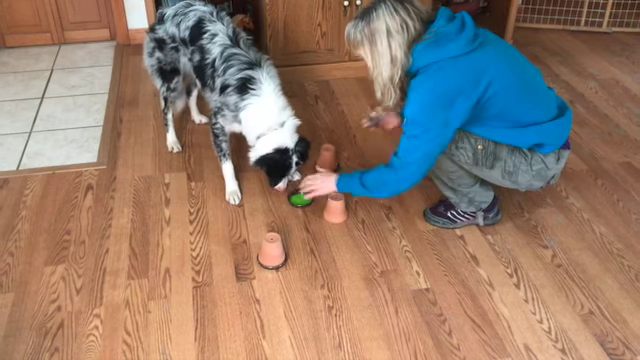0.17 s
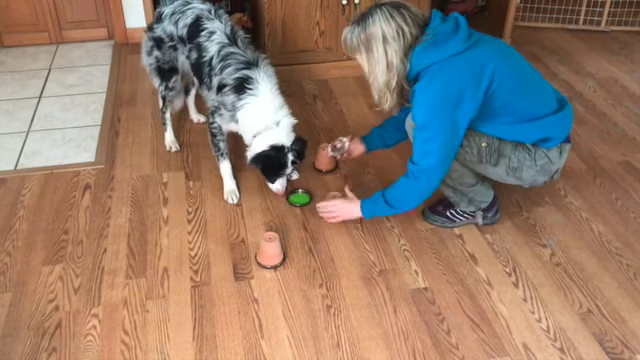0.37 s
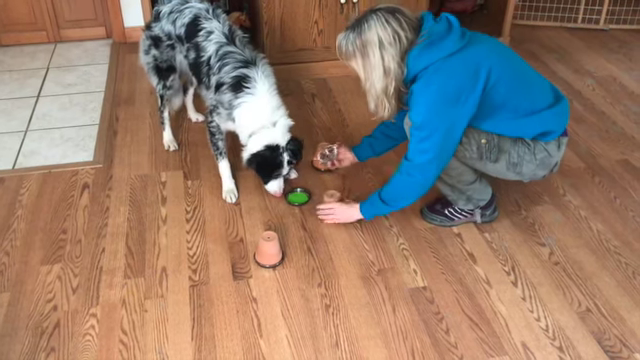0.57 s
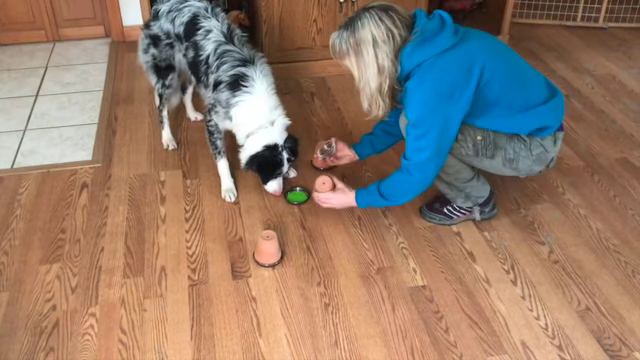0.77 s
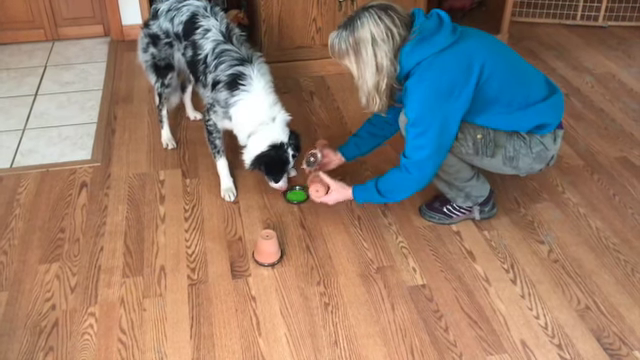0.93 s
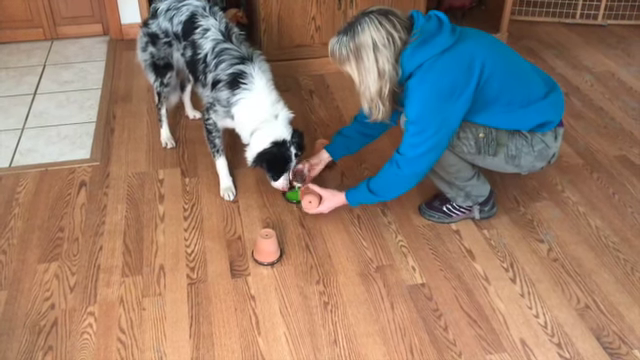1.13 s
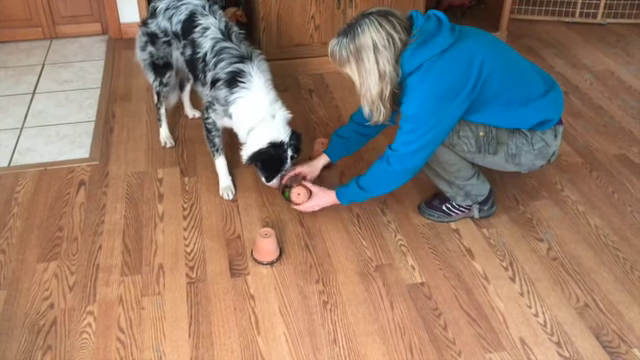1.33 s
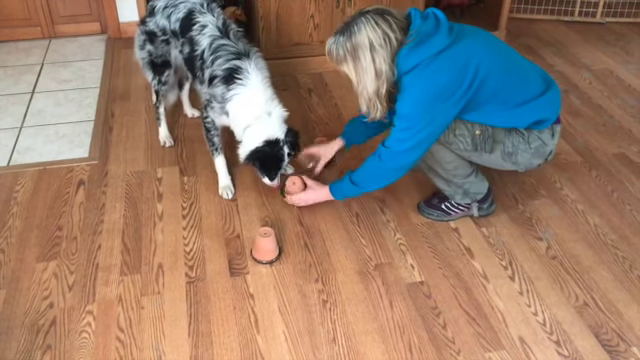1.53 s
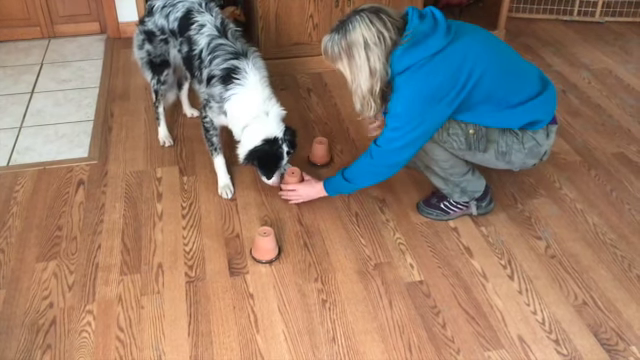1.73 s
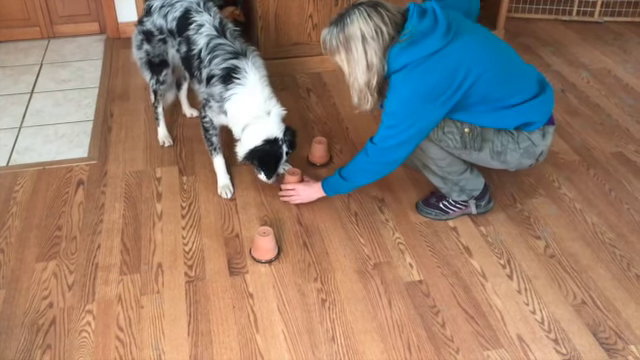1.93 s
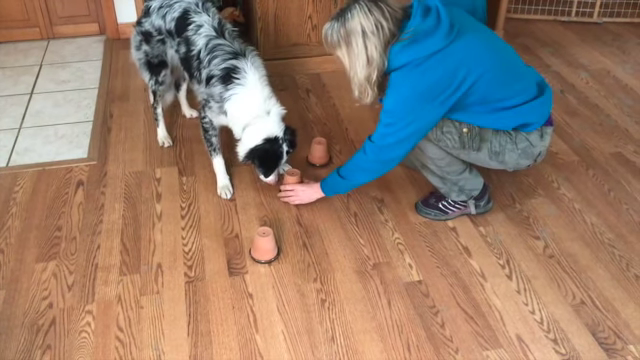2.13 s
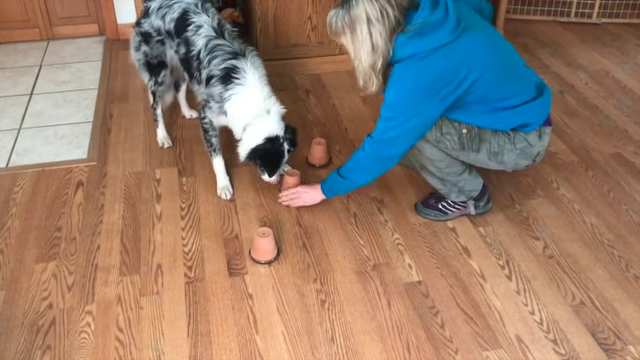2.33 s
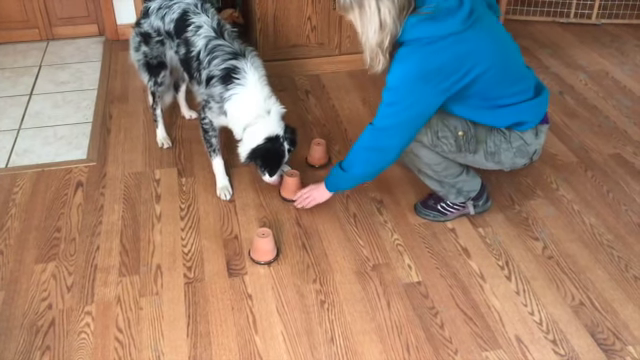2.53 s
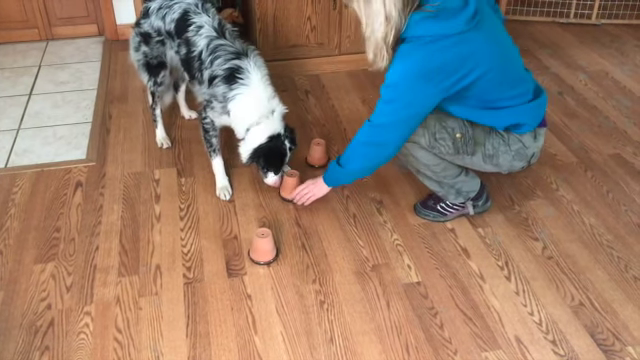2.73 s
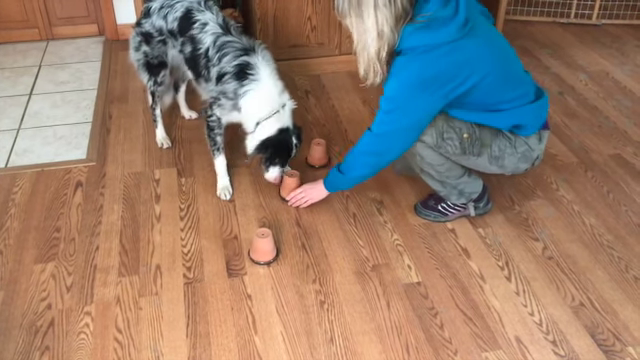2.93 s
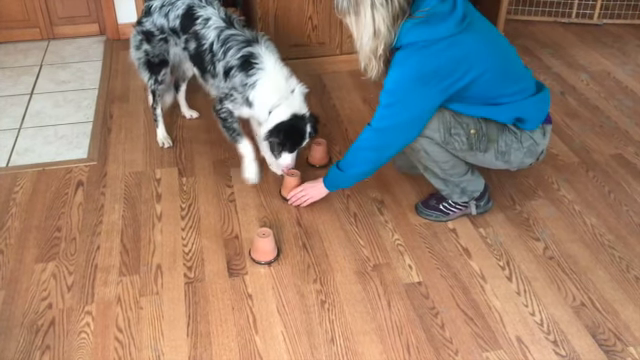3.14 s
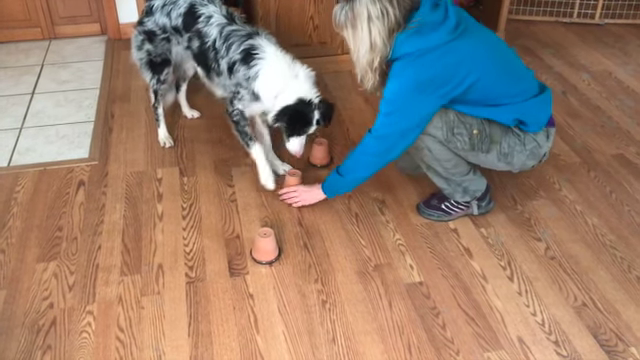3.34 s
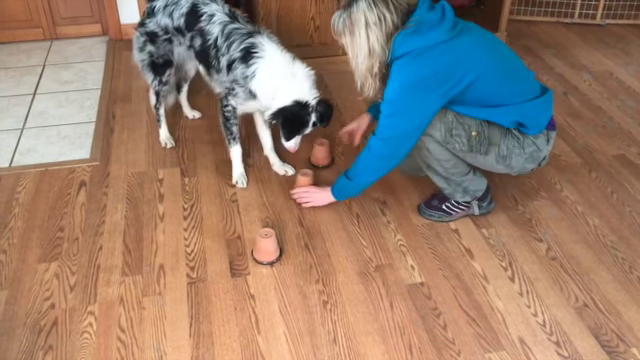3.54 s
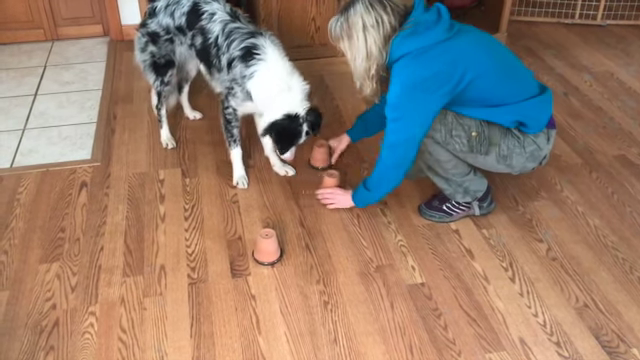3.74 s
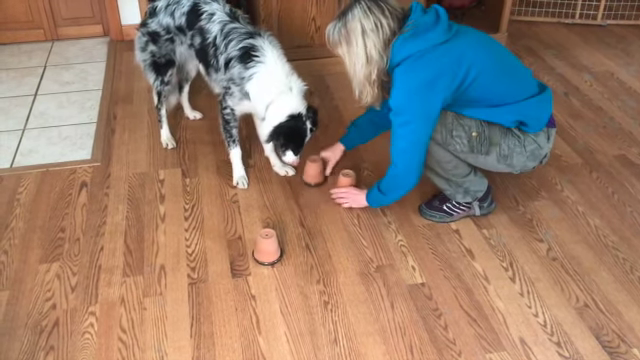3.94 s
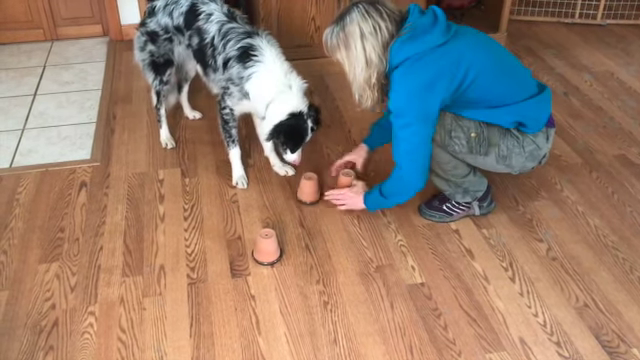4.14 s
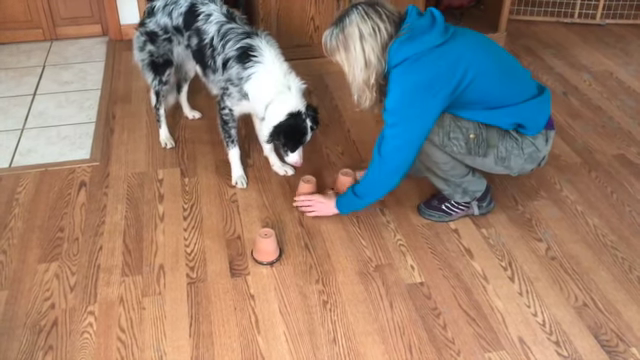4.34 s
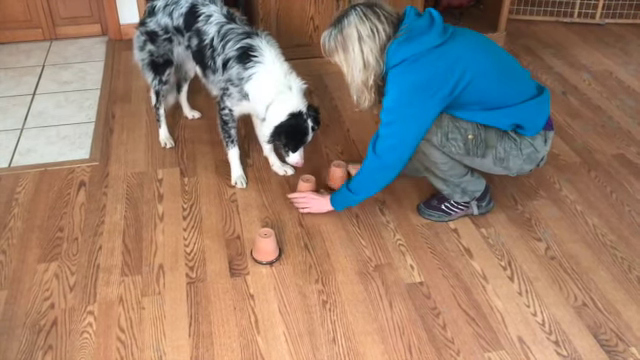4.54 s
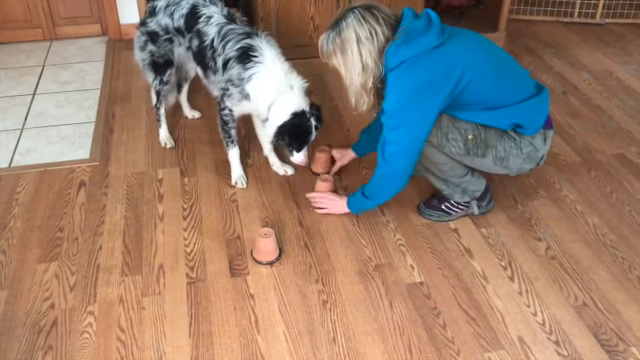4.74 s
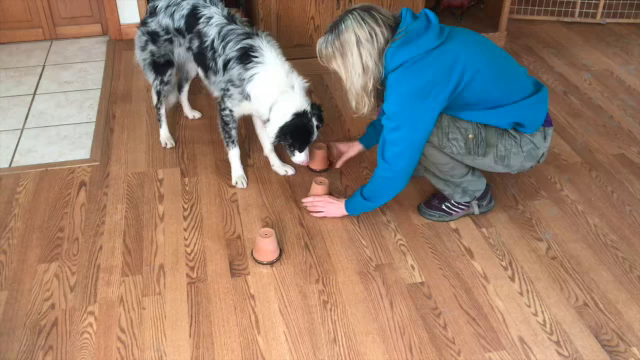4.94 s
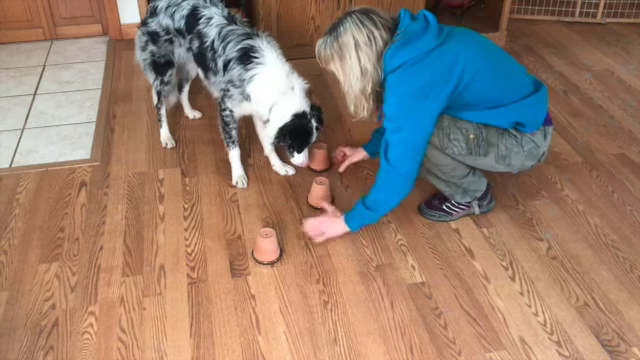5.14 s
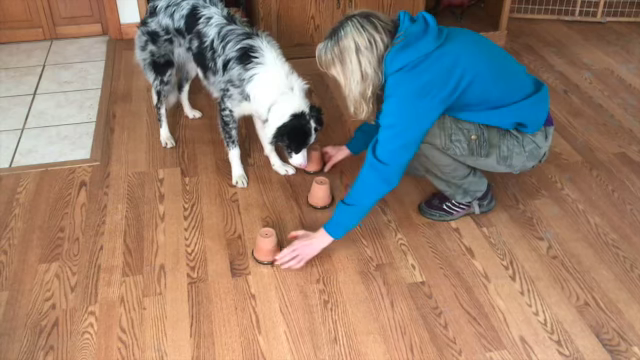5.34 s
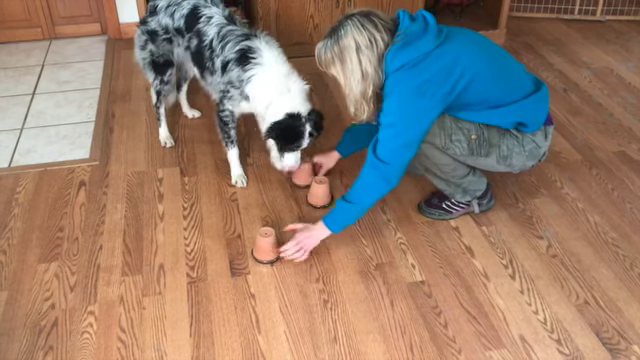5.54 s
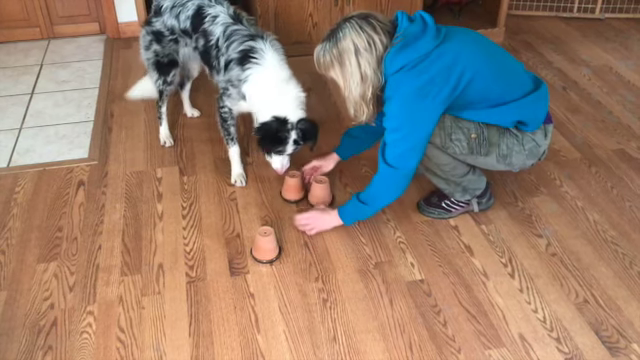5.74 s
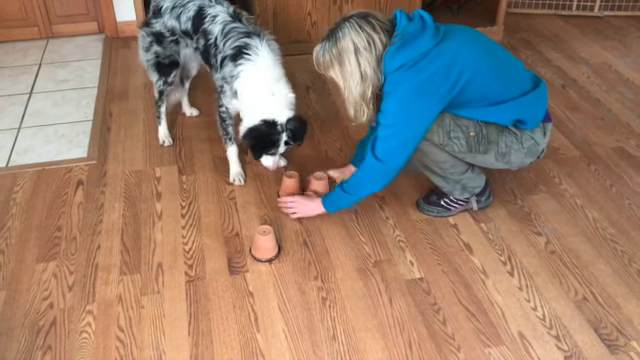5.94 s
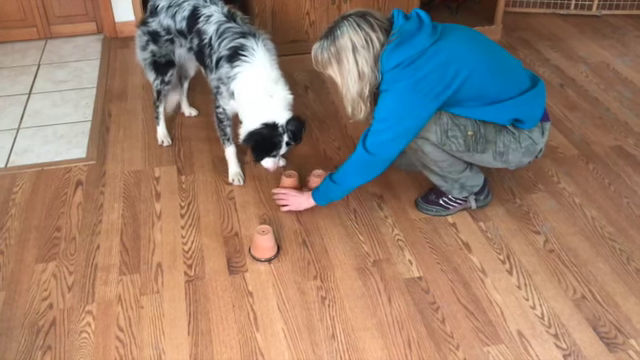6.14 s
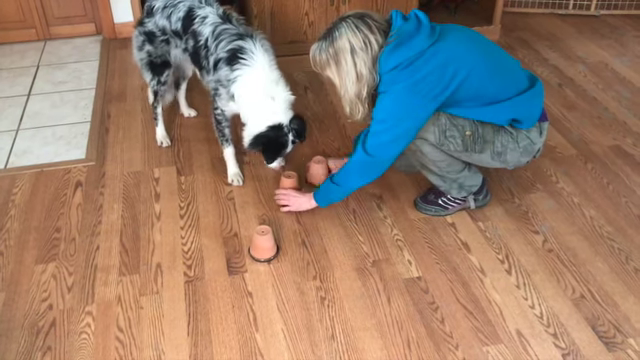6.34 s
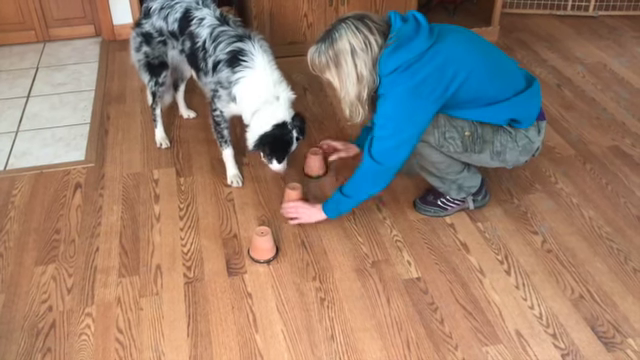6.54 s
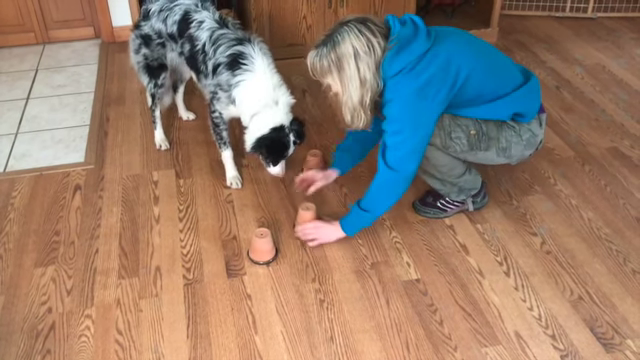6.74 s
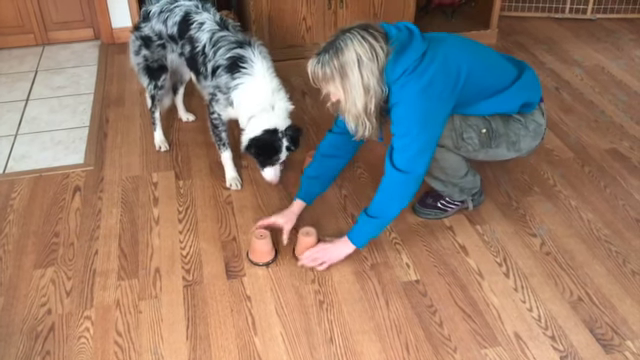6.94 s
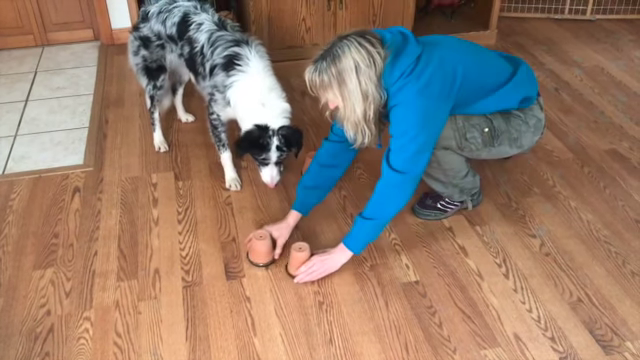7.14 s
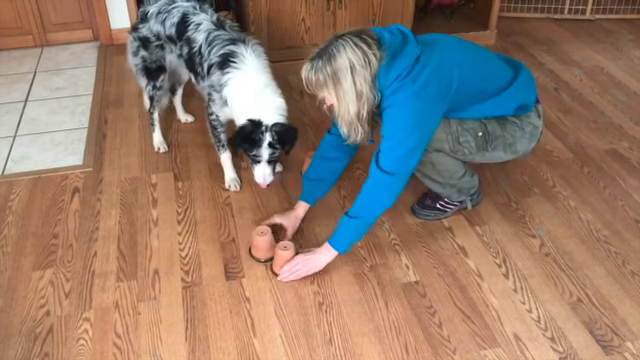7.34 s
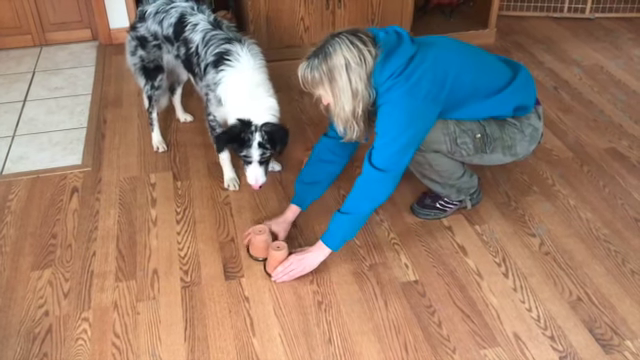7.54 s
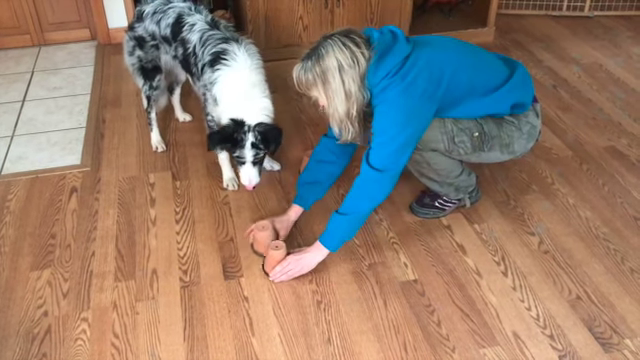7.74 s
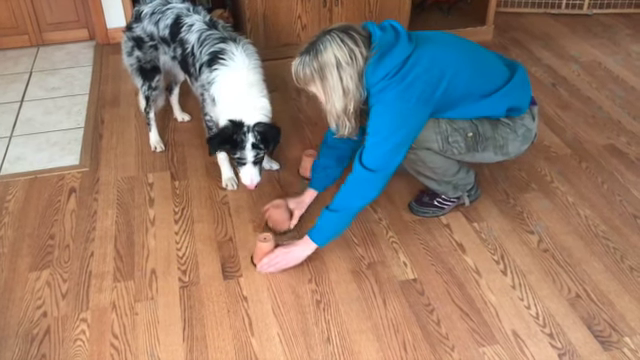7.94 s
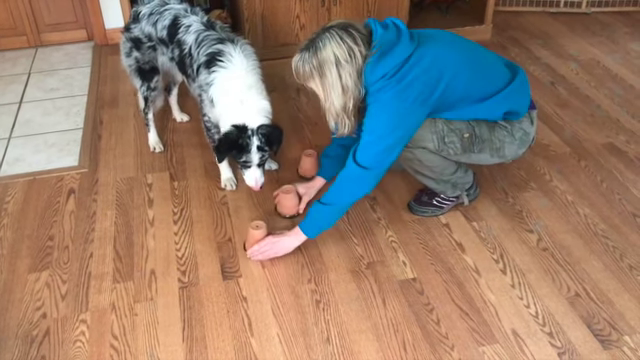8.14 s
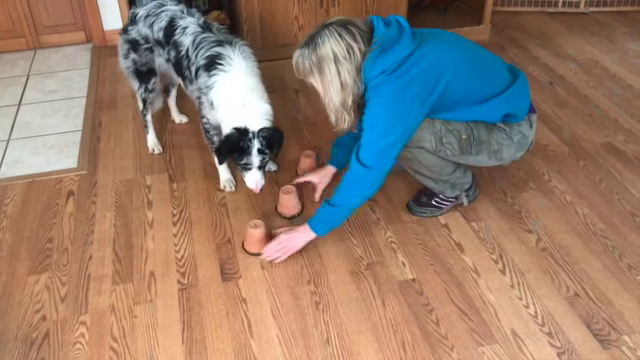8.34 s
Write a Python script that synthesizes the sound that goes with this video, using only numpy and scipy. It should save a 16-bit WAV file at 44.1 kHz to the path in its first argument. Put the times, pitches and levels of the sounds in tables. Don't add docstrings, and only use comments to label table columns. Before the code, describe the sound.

A distant small camera microphone with soft hiss, a thin whine and regular faint ticks picks up terracotta pots on floorboards. A pot is set down with a woody knock and rocks back, then after a pause pots are pushed in rough, juddering strokes. Short ceramic clacks and light touches punctuate the slides, which come faster and closer together as the room answers with a short reverberation.

```python
import sys
import numpy as np
from scipy import signal
from scipy.fft import rfft, irfft
from scipy.io import wavfile
from scipy.ndimage import uniform_filter1d

SR = 44100
rng = np.random.default_rng(int(sys.argv[2]) if len(sys.argv) > 2 else 0)


def inscribe(sig):
    pcm = np.round(np.clip(np.atleast_2d(sig).T, -1, 1) * 32767)
    wavfile.write(sys.argv[1], SR, pcm.astype(np.int16))


def linear_from_db(decibels):
    return 10 ** (np.asarray(decibels, float) / 20)


N = 369999


def unit(x):
    return x / np.sqrt(np.mean(x ** 2) + 1e-30)


def response(points, size=2048):
    hz, db = np.transpose(points)
    log_hz = np.log(np.fft.rfftfreq(size, 1 / SR) + 1)
    cepstrum = irfft(np.interp(log_hz, np.log(hz), db) * np.log(10) / 20)
    cepstrum[1:size // 2] *= 2
    cepstrum[size // 2 + 1:] = 0
    h = irfft(np.exp(rfft(cepstrum)))
    return h / np.sqrt(np.sum(h ** 2))


def ring(x, hz, width_hz):
    r = np.exp(-np.pi * width_hz / SR)
    turn = 2 * np.pi * hz / SR
    gain = np.sin(turn) * np.sqrt(2 * (1 - r * r))
    return signal.lfilter([gain], [1, -2 * r * np.cos(turn), r * r], x)


def walk(rate, size, step=1):
    k = int(SR / rate / step)
    held = np.repeat(rng.standard_normal(size // k + 1), k)
    return 1.5 * uniform_filter1d(uniform_filter1d(held, k), k)[:size]


def band(x, lo_hz, hi_hz, order=2):
    return signal.sosfilt(signal.butter(order, [lo_hz, hi_hz], "band", fs=SR, output="sos"), x)


def below(x, hz):
    return signal.sosfiltfilt(signal.butter(2, hz, fs=SR, output="sos"), x)


# f/Hz, density/dB
HISS_COLOUR = [(24, -29), (40, -4.5), (80, -6.5), (148, -3.5), (204, -3), (448, -15), (1330, -16),
               (2710, -28), (3560, -25.5), (5820, -28), (6270, -25), (6750, -29), (10500, -37),
               (14500, -31)]
# f/Hz, width/Hz, level/dB
HUMS = [(59.1, 3, -71), (100, 6.4, -71.5), (203.7, 2.4, -80), (255, 3.1, -79.5), (296.2, 4.8, -78.5),
        (3640, 4.5, -92)]


def house():
    hiss = signal.fftconvolve(rng.standard_normal(N), response(HISS_COLOUR))[:N]
    hums = sum(linear_from_db(db) * unit(ring(rng.standard_normal(N), hz, width)) for hz, width, db in HUMS)
    return unit(hiss) * linear_from_db(-67) + hums


# f/Hz, tremble/Hz, level/dB
WHINE_TONES = [(6120, 4, -97), (6240, 28, -84), (6460, 7, -91), (12904, 20, -99)]
# stop t/s, start t/s (no pause if the start comes first)
PAUSES = [
    (1.113, 0.99),
    (2.395, 2.428),
]
# first t/s, period/s, last t/s, level/dB
TICK_SERIES = [
    (.0145, .30763, 8.39, -50),
    (.118, .30763, 1.1, -52),
    (.2205, .30763, 1.2, -53),
    (.002, .05008, 8.39, -62),
]
TICK_TRIM = [0.3, 0.3, 0.3, 0.3]
# f/Hz, width/Hz, level/dB
TICK_MODES = [(3500, 1600, 3.5), (4330, 1000, -6), (8400, 510, -7), (14000, 2500, -15)]
# f/Hz, width/Hz, level/dB
LATCH_MODES = [(2470, 700, 1), (3580, 640, 4), (6750, 1400, -5)]


def camera():
    t = np.arange(N) / SR
    running, ticks, latches = np.ones(N), np.zeros(N), np.zeros(N)
    for stop, start in PAUSES:
        running[int(stop * SR):int(start * SR)] = .1
        latches[int(stop * SR)] = linear_from_db(-48)
    for (first, period, last, db), trim_db in zip(TICK_SERIES, TICK_TRIM):
        i = (np.arange(first, last, period) * SR).astype(int)
        ticks[i] += linear_from_db(db + trim_db + .8 * rng.standard_normal(len(i)))
    whine = np.zeros(N)
    for hz, tremble_hz, db in WHINE_TONES:
        phase = 2 * np.pi * np.cumsum(hz + tremble_hz * walk(150, N)) / SR
        whine += linear_from_db(db + 3.5) * np.sin(phase)
    clicks = sum(linear_from_db(db) * ring(ticks, hz, width) for hz, width, db in TICK_MODES)
    clicks += sum(linear_from_db(db) * ring(latches, hz, width) for hz, width, db in LATCH_MODES)
    clicks = signal.sosfilt(signal.butter(2, 2000, "high", fs=SR, output="sos"), clicks)
    beat = np.cos(2 * np.pi * 29.97 * t + 1.1)
    chirp = unit(ring(ring(rng.standard_normal(N), 15500, 1600), 15500, 1600))
    flicker_db = 4 * beat + 5 * walk(120, N)
    return whine * uniform_filter1d(running, 200) + clicks + chirp * linear_from_db(-88 + flicker_db)


# f/Hz, density/dB
GRIT_COLOUR = [(1470, -29.5), (2500, -5), (3010, -3.5), (3260, -1.5), (3820, -1.5), (4190, 2), (5010, -8.5),
               (6000, -9), (7270, -19.5), (7790, -19.5), (8310, -26.5), (10000, -31.5), (13000, -55),
               (22000, -120)]
# f/Hz, level/dB, t60/s
HELD_MODES = [(588, -6, 0.065), (1012, -12, 0.065), (1278, -3, 0.041), (3395, -13.5, 0.05),
              (4050, -19.5, .06), (4600, -24.5, 0.033), (5870, -18.5, 0.042), (6800, -39, 0.043),
              (7460, -40, .03)]
# f/Hz, level/dB, t60/s
FREE_MODES = [(1170, -15, 0.072), (1526.7, -8.5, 0.075), (3300, -18.5, 0.066), (3660, -16, 0.027),
              (1485, -8, 0.15), (4086, -10, 0.037), (4280, -22.5, 0.057), (5930, -27, 0.05),
              (6760, -25, 0.057), (7600, -32, .04), (9400, -37.5, 0.05), (10000, -46.5, 0.045),
              (12050, -43.5, .02), (12800, -44, .025)]
SET_DOWN_S = 3.0
CONTACT_HZ = 300


def pot(crack, wall, patchy_db, damping, edge_db):
    out = signal.fftconvolve(crack, response(GRIT_COLOUR))[:N]
    held = np.arange(N) < SET_DOWN_S * SR
    for modes, share in ((HELD_MODES, held), (FREE_MODES, ~held)):
        for hz, db, t60 in modes:
            stilled_db = edge_db * (hz < 2000 or hz > 7000)
            gain = linear_from_db(db + stilled_db + patchy_db * walk(7, N // 50 + 1, step=50))
            push = wall * share * np.repeat(gain, 50)[:N]
            push = band(push, hz - CONTACT_HZ, hz + CONTACT_HZ, order=1)
            out = out + ring(push, hz, damping * np.log(1000) / np.pi / t60)
    return out


BREAKAWAY = 0.24


def speed(t, start, full, slows, stop):
    rise = np.sin(np.pi / 2 * np.clip((t - start) / max(full - start, .003), 0, 1))
    fall = np.sin(np.pi / 2 * np.clip((stop - t) / max(stop - slows, .003), 0, 1))
    return np.maximum((BREAKAWAY + (1 - BREAKAWAY) * rise) * fall, .01)


# f/Hz, density/dB
BOARD_COLOUR = [(59, -49.5), (100, -25.5), (124, -28), (207, -10), (324, -13.5), (475, -6), (528, -8.5),
                (579, -3), (796, -1.5), (1520, 1), (2350, -17), (3060, -62.5), (5170, -120)]
# start t/s, full speed t/s, slowing t/s, stop t/s, drag level/dB at full speed
HAND_PUSHES = [(0.001, 0.002, 0.01, .05, -64.5), (.566, 0.602, 0.61, 0.67, -61.5),
               (1.228, 1.26, 1.28, 1.37, -56.5), (1.825, 1.853, 1.84, 1.935, -62),
               (2.165, 2.215, 2.22, 2.32, -57.5), (3.396, 3.558, 3.91, 3.94, -40.5),
               (3.805, 3.878, 4.17, 4.355, -40), (4.412, 4.67, 4.74, 5.074, -37.5),
               (5.292, 5.324, 5.48, 5.6, -45.5), (5.41, 5.56, 5.71, 5.73, -39),
               (5.706, 5.722, 5.7, 5.84, -34), (5.805, 5.874, 5.992, 6.082, -48),
               (6.122, 6.325, 6.61, 6.64, -39.5), (6.505, 6.567, 6.62, 6.7, -37.5),
               (6.612, 6.692, 7, 7.06, -36.5), (6.915, 6.982, 7.065, 7.22, -37),
               (7.218, 7.263, 7.43, 7.47, -38.5), (7.442, 7.45, 7.37, 7.49, -34.5),
               (7.542, 7.602, 7.9, 8, -52), (7.646, 7.657, 7.55, 7.752, -39),
               (7.715, 7.775, 7.955, 8.005, -37), (7.965, 7.99, 8.04, 8.105, -36.5),
               (8.035, 8.085, 8.2, 8.32, -39.5)]
# grit level/dB, board belly level/dB, wall level/dB,
# trapped air f/Hz, trapped air level/dB
SEATS = [(-3.5, -14, -11, 801, -26), (-10.5, -2, -8, 690, -7), (-9.5, -2, -6, 790, -13),
         (-7, 0, -9, 640, -12), (-18, -13, -13, 740, -26), (-10, -3, -9, 793, -17),
         (-12, -2.5, -11, 801, -19), (-10, -3.5, -7, 795, -15), (-7.5, -3, 0.5, 810, -19),
         (-11, -3.5, -8, 720, -19), (-10, -7, 2, 800, -19), (-11, -5.5, -11, 798, -21),
         (-12, -3, -8, 958, -19), (-10.5, -4.5, -9, 970, -24), (-15.5, -11, -12, 950, -27),
         (-14.5, -4, -12, 958, -18), (-10, -0.5, -6, 690, -20), (-6.5, -7.5, 1, 621, -18),
         (-9, -5, -11, 480, -21), (-13, -8, -11, 527, -17.5), (-11, -3, -13, 531, -12),
         (-10, -0.5, -11, 527, -9), (-11, -1.5, -9, 530, -15)]
DRAG_DB_PER_DECADE = 35.5
RUMBLE_DB, SLOW_RUMBLE, SLOW_GRIT = -15, 0.31, -0.23
ROCK_DB, ROCK_PER_S = 2.5, 12.45
AIR_Q = 18
STEADY_S = .07


def slides():
    tap, belly, rumble, grit, wall, hollow = np.zeros((6, N))
    for (*moments, full_db), (grit_db, belly_db, wall_db, air_hz, air_db) in zip(HAND_PUSHES, SEATS):
        i = np.arange(int(moments[0] * SR), min(int(moments[-1] * SR), N))
        n = len(i)
        lost_db = -DRAG_DB_PER_DECADE * np.log10(speed(i / SR, *moments))
        drag_db = full_db - lost_db
        caught, side, size = rng.random((n, 3)).T
        grains = (caught < 2500 / SR) * np.sign(side - .5)
        grains = grains * linear_from_db(-2.2 * np.log(size + .01))
        judder = grains * linear_from_db(2.33 * walk(70.3, n))
        steady = np.sqrt(uniform_filter1d(judder ** 2, int(STEADY_S * SR)) + 1e-9)
        drag = judder / steady * linear_from_db(drag_db - 5)
        fine = unit(rng.standard_normal(n) * linear_from_db(1.55 * walk(42.7, n))) * linear_from_db(drag_db - 13)
        belly_rock, rumble_rock, grit_rock = [ROCK_DB * walk(ROCK_PER_S, n) for _ in range(3)]
        rumble_db = RUMBLE_DB + 14 + 0.35 * belly_db + SLOW_RUMBLE * lost_db
        tap[i] += drag * linear_from_db(.7 * walk(18, n))
        belly[i] += drag * linear_from_db(belly_db + 3.5 + belly_rock)
        rumble[i] += drag * linear_from_db(rumble_db + rumble_rock)
        grit[i] += (0.68 * drag + 0.91 * fine) * linear_from_db(grit_db + SLOW_GRIT * lost_db + .5 * grit_rock)
        wall[i] += drag * linear_from_db(wall_db - 11)
        puff = np.zeros(N)
        puff[i] = drag * linear_from_db(air_db + 3 * walk(20, n))
        hollow += ring(puff, air_hz, air_hz / AIR_Q)
    push = tap + below(belly - tap, 950) + below(rumble - belly, 420)
    boards = signal.fftconvolve(push, response(BOARD_COLOUR))[:N]
    return boards + pot(grit, wall, patchy_db=4, damping=2.4, edge_db=-8) + hollow


# delay t/ms, level/dB
REFLECTIONS = [(1.6, -12), (5.4, -8), (7.8, -13), (11.2, -7), (14, -14), (29, -14)]
# f/Hz, t60/s
TAIL_BANDS = [(250, 0.82), (700, 0.38), (1400, 0.43), (2800, 0.37), (5600, 0.45), (11000, 0.17)]
TAIL_DB = -2


def room(dry, count=4):
    t = np.arange(int(.8 * SR)) / SR
    place = np.arange(N) / SR / .09
    out = dry
    for k in range(count):
        tail = 0
        for hz, t60 in TAIL_BANDS:
            noise = band(rng.standard_normal(len(t)), hz / 1.61, min(hz * 1.465, 20000))
            tail = tail + noise * linear_from_db(-60 * t / t60)
        tail = tail * (1 - np.exp(-t / 0.0031))
        h = tail / np.sqrt(np.sum(tail ** 2)) * linear_from_db(TAIL_DB)
        for (ms, db), shift in zip(REFLECTIONS, rng.uniform(-1, 1, len(REFLECTIONS))):
            h[int((ms + .35 * shift) * SR / 1000)] += linear_from_db(db)
        away = np.abs((place - k + count / 2) % count - count / 2)
        here = dry * np.cos(np.pi / 2 * np.minimum(away, 1))
        out = out + signal.fftconvolve(here, h)[:N]
    return out


# t/s, peak level/dB, crack level/dB over thump, wall level/dB,
# thump f/Hz
BLOWS = [(0.581, -59, -24, -15, 710), (0.627, -52.5, -23, -7, 776), (1.24, -56, -17, -19, 880),
         (1.84, -57, -16, -8, 677), (1.899, -53, -20, -16, 640), (1.979, -27, -11.5, -7, 1200),
         (3.409, -42, -22, -13, 1270), (3.429, -45, -9, -10, 1580), (4.424, -47, -3, -18, 1170),
         (5.304, -47, -6, -11, 1240), (5.699, -21.5, -28, 1.5, 1308), (5.713, -29.5, 2.5, 1, 1401),
         (5.717, -28.5, 1, 5, 1480), (6.143, -39, -9, -20, 1166), (6.193, -38.5, -21, -14, 770),
         (7.4384, -22, -0.5, -2, 1400), (7.449, -33.5, 4, 1.5, 1486), (7.614, -39, -25, -1, 1170),
         (7.639, -25.5, -8, -4, 1530), (7.645, -23, -12, -6.5, 1170), (7.667, -30.5, -12, -1.5, 1470),
         (7.683, -32, -16, -2.5, 1470),
         (2.0382, -26.5, -16, -12, 1180),
]
# t/s, peak level/dB, wall level/dB
TOUCHES = [(3.465, -63, -8), (3.6564, -52, -15), (3.9094, -40, -6), (4.0847, -45, -12), (4.5313, -51, -11),
           (5.4, -59, 1), (5.6077, -42, -4.5), (6.117, -57.5, -5), (6.567, -44.5, -2),
           (6.6197, -42.5, -2.5), (6.8427, -49, -6), (6.9186, -50, -3), (6.9646, -46, -3),
           (7.283, -55.5, -4), (7.8958, -41.5, 1)]
CHATTER_S = .0018
THUD_DB, THUD_HZ = -5.5, 513


def knocks():
    thumps, thud, crack, wall = np.zeros((4, N))
    t = np.arange(600) / SR
    n = len(t)
    swell = t / CHATTER_S * np.exp(-t / CHATTER_S)
    chatter = rng.standard_normal((60, n)) * swell / np.sqrt(np.sum(swell ** 2))
    for (s, peak_db, crack_db, wall_db, hz), rim in zip(BLOWS, chatter):
        i = int(s * SR)
        cycles = hz * t / 0.81
        envelope = cycles ** 2 * np.exp(2 - 2 * cycles)
        thumps[i:i + n] += linear_from_db(peak_db + 4) * envelope * np.sin(2 * np.pi * hz * t)
        thud[i] += linear_from_db(peak_db + THUD_DB)
        crack[i:i + n] += linear_from_db(peak_db + crack_db + 14) * rim
        wall[i + 30] += linear_from_db(peak_db + wall_db + 19)
    for (s, peak_db, wall_db), rim in zip(TOUCHES, chatter[::-1]):
        i = int(s * SR)
        crack[i:i + n] += linear_from_db(peak_db + 19) * rim
        wall[i + 30] += linear_from_db(peak_db + wall_db + 31.5)
    crack = crack - .8 * below(crack, 3100)
    boards = band(signal.fftconvolve(thud, response(BOARD_COLOUR))[:N], 150, THUD_HZ)
    return thumps + 10 * boards + pot(crack, wall, patchy_db=1.5, damping=1.1, edge_db=0.2)


# t/s, f/Hz, level/dB
HEEL_THUD = (4.45, 42, -52)


def heel():
    s, hz, db = HEEL_THUD
    t = np.arange(N) / SR - s
    return linear_from_db(db) * np.exp(-(t / 0.0091) ** 2) * np.sin(2 * np.pi * hz * t)


# lower f/Hz, upper f/Hz
SHADOWS = [(10350, 11400), (14500, 18000)]


def scene():
    pots = room(band(slides() + knocks(), 120, 18000))
    for lo_hz, hi_hz in SHADOWS:
        pots = signal.sosfilt(signal.butter(2, [lo_hz, hi_hz], "bandstop", fs=SR, output="sos"), pots)
    return (pots + house() + heel() + camera())[None]


def roll_off(x):
    return signal.sosfilt(signal.butter(12, 15940, fs=SR, output="sos"), x)


def record(dry):
    mix = signal.sosfilt(signal.ellip(10, .2, 70, 15800, fs=SR, output="sos"), dry)
    return roll_off(mix)


dry = scene()
out = record(dry)
inscribe(out)
```